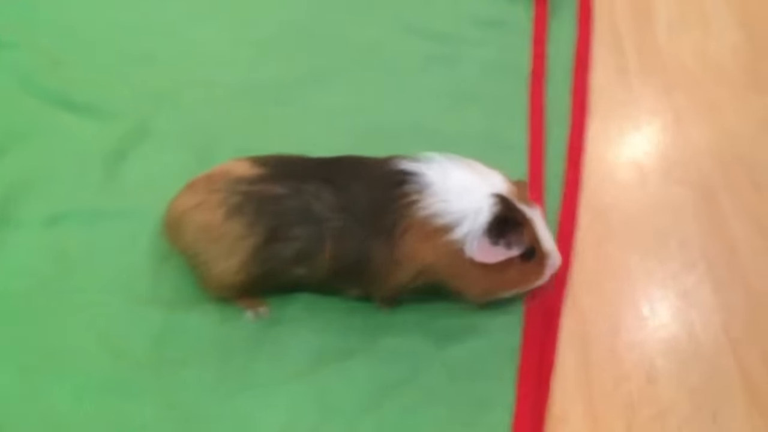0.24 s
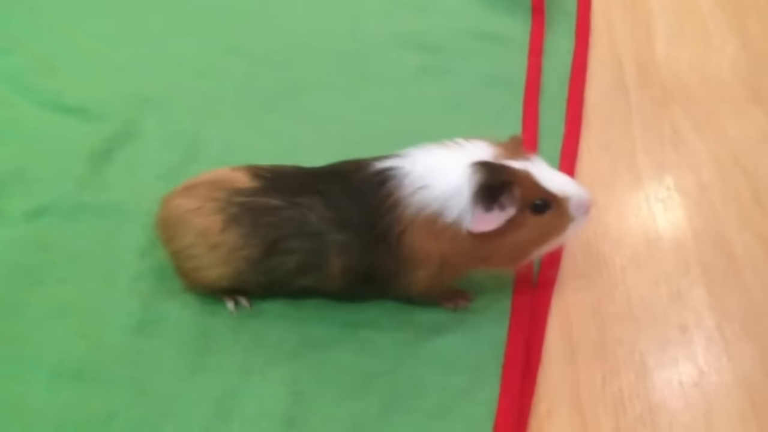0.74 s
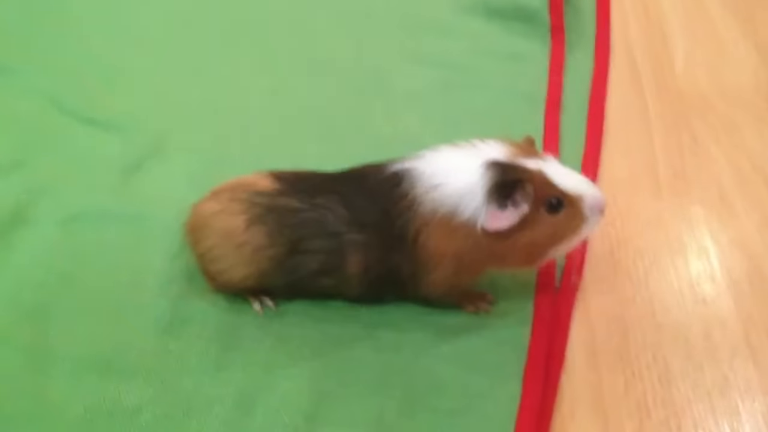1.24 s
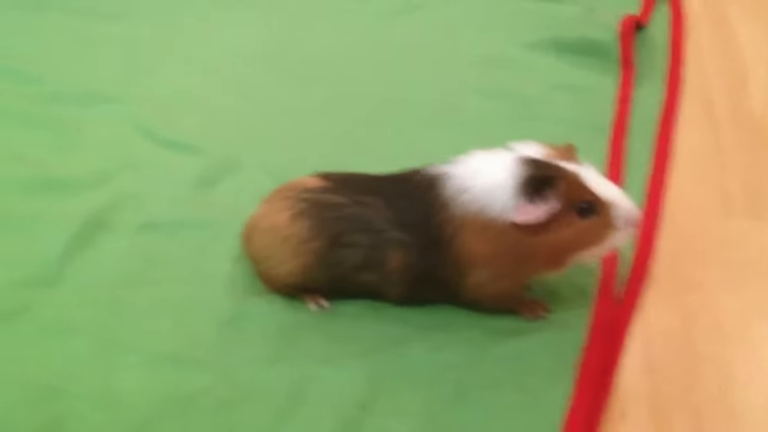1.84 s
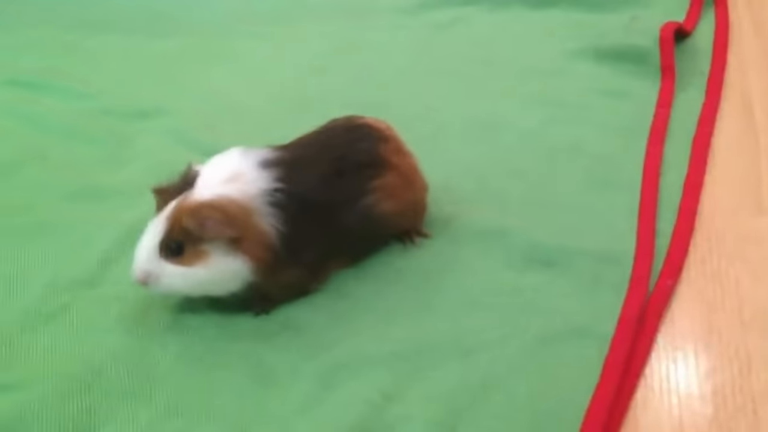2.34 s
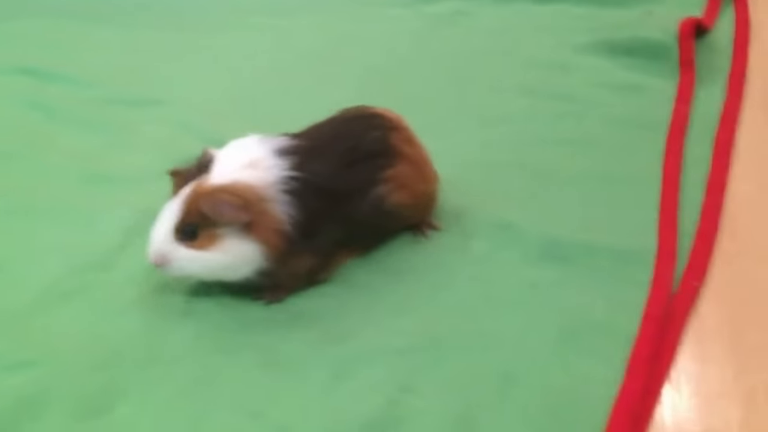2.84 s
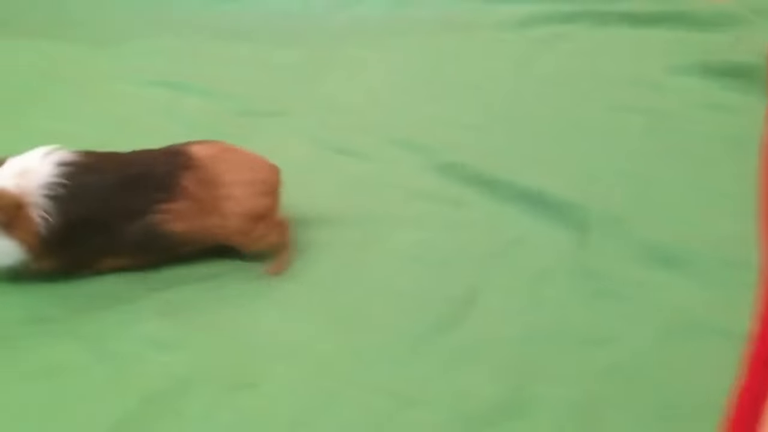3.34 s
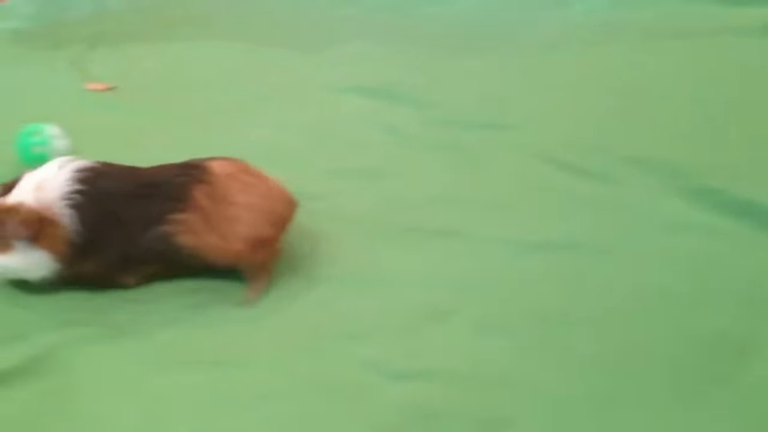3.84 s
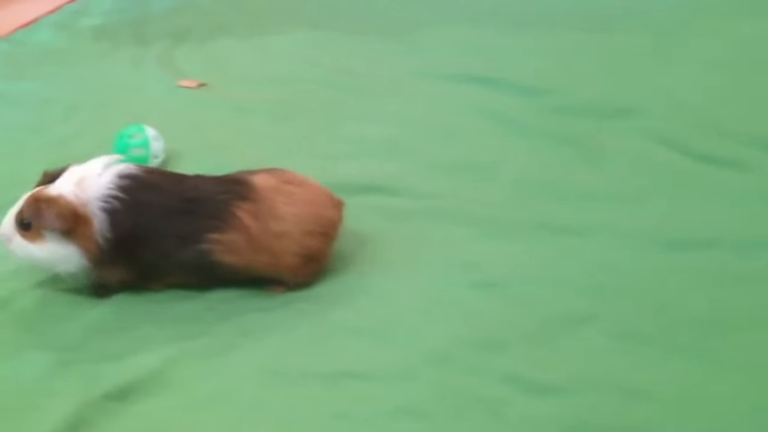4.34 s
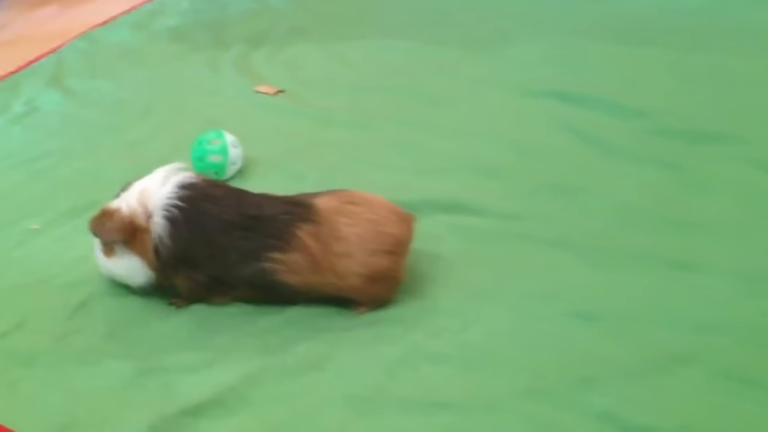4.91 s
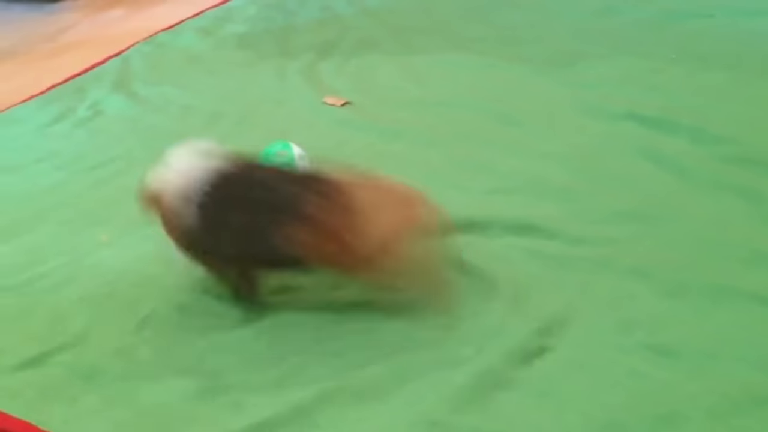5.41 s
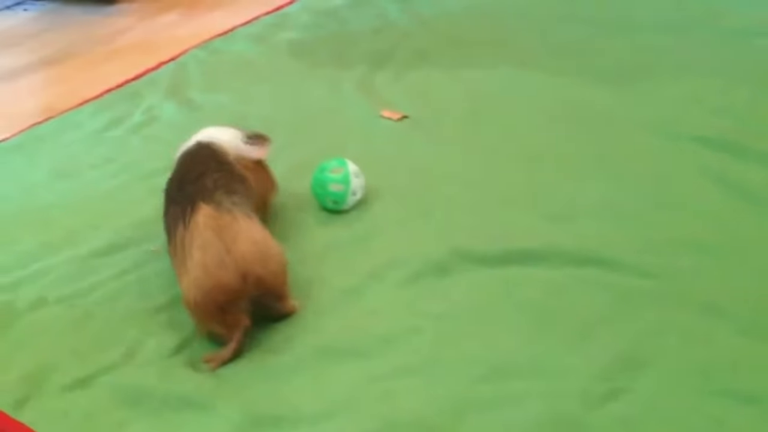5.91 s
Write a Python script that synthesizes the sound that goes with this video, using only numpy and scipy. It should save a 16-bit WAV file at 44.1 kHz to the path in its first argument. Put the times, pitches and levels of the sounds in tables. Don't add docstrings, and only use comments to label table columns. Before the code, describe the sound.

A guinea pig on a plastic-coated mat gives two short rising squeaks amid claw ticks and soft paw pats. Then the mat is dragged with a swelling rustle and a brief low fold drumming, the loudest moment. A scurry of ticks follows, with a run of squeaks and a very faint bell-ball tinkle, then a quick closing cluster of squeaks. Small hard-floored room, single close microphone, low hiss and rumble.

```python
import sys
import numpy as np
from scipy import signal
from scipy.fft import rfft, irfft, next_fast_len
from scipy.io import wavfile
from scipy.ndimage import map_coordinates

SR = 44100
rng = np.random.default_rng(int(sys.argv[2]) if len(sys.argv) > 2 else 0)


def inscribe(sig):
    pcm = np.round(np.clip(np.atleast_2d(sig).T, -1, 1) * 32767)
    wavfile.write(sys.argv[1], SR, pcm.astype(np.int16))


def ratio_of_db(decibels):
    return 10 ** (np.asarray(decibels, float) / 20)


N = 272097


def unit(x):
    return x / np.sqrt(np.mean(x ** 2) + 1e-20)


def noise():
    return rng.standard_normal(N)


def along(points, hz):
    f, v = np.transpose(points)
    return np.interp(np.log(hz + 1), np.log(f + 1), v)


def curves(rows, t):
    s, *cols = np.transpose(rows)
    return [np.interp(t, s, c) for c in cols]


def wobble(rate_hz):
    knots = rng.standard_normal(int(N * rate_hz / SR) + 4)
    return map_coordinates(knots, [np.arange(N) * rate_hz / SR])


def filtered(x, response):
    m = next_fast_len(N + 8192)
    return irfft(rfft(x, m) * response(np.fft.rfftfreq(m, 1 / SR)), m)[:N]


def modes(table):
    def response(f):
        return sum(ratio_of_db(db) * 1j * f * w / (c * c - f * f + 1j * f * w) for c, w, db in table)
    return response


def lowpass(corner_hz, order):
    return lambda f: 1 / (1 + (f / corner_hz) ** order)


def swell_db(t, start, end, rise_s, fall_s):
    early = np.clip(start - t, 0, None) / rise_s
    late = np.clip(t - end, 0, None) / fall_s
    return -20 * (early + late)


# start t/s, length t/s, level/dB, low pitch f/Hz, held pitch f/Hz
SQUEAKS = [(.114, 0.12, -51, 473.4, 558.8), (.597, 0.074, -52, 505, 509.5), (3.059, 0.047, -56.5, 513, 533),
           (3.271, 0.029, -55.5, 498, 509.5), (3.426, 0.12, -51.5, 519.8, 577.4),
           (3.682, 0.14, -53, 453, 543.4), (3.989, 0.11, -54.5, 516, 554), (4.498, .066, -54.5, 495, 489.7),
           (5.464, 0.066, -53.5, 442, 690), (5.529, 0.042, -53.5, 656, 653), (5.579, 0.06, -57.5, 647, 678),
           (5.754, .19, -54.5, 468, 557)]
# climb t/s, opening catch f/Hz, closing flick f/Hz, mouth opening level/dB, shrillness level/dB
EFFORT = [(0.0348, 94, 91, 0.5, -3), (0.035, 48, 77, 0, -6), (.03, 97, 5.5, -5, -12),
          (0.0087, 1, 4.3, -2, -14), (0.138, 17, 12, -0.5, -14), (0.0355, 2.6, 140, 0, -4),
          (0.1026, 5, 35, 2, -3), (.02, 48, 68, -5.5, -5), (.04, 89, 4, -4, 1), (0.023, 42, 5, 0.5, 1),
          (0.021, 3, 5, -4, 4), (0.089, 27.6, 142, -0.5, -1)]
RASP = [(.03, .25, .08), (.05, .3, .08), (.05, .45, .2), (.05, .6, .5), (.1, 1, .35), (.1, .4, .12),
        (.5, .3, .15), (.12, .5, .2), (.15, .7, .5), (.1, .5, .3), (.9, .6, .5), (.2, .65, .35)]
# f/Hz, level/dB
THROAT = [(1900, -5), (2300, -11), (2800, -15), (3500, -15), (4200, -20), (6000, -44)]
# f/Hz, width f/Hz, level/dB
HOARSE = [(600, 430, 18), (1500, 600, -15)]
ATTACK_S, RELEASE_S, SETTLE_S = 0.0064, 0.0043, 0.045
CATCH_S, FLICK_S, OVERSHOOT = 0.00915, 0.01727, 1.6
SWELL_DB, SPENT_DB = -0.5, 0.5
SECOND_DB, THIRD_DB, CLOSING_DB = -4.5, -9.5, -4
LAX_DB, LAX_S = -4.5, 0.082
END_ROUGH, HOARSE_DB = 0.3, -12


def squeaks():
    out, jitter, shimmer = np.zeros(N), wobble(90), wobble(45)
    flutter = [wobble(600) for k in range(8)]
    drift = [wobble(35) for k in range(8)]
    hoarse = unit(filtered(noise(), lambda f: modes(HOARSE)(f) * lowpass(3200, 4)(f)))
    for squeak, effort_row, rasp in zip(SQUEAKS, EFFORT, RASP):
        start, length, db, low_hz, held_hz = squeak
        climb, catch_hz, flick_hz, mouth_db, shrill_db = effort_row
        doubled, rough_start, rough_settled = rasp
        cut = slice(round(start * SR), round((start + length) * SR))
        t = np.arange(cut.stop - cut.start) / SR

        effort = 1 - np.exp(-(t / climb) ** 1.495) * np.cos(OVERSHOOT * t / climb)
        closing = np.exp((t - length) / FLICK_S)
        hz = low_hz + (held_hz - low_hz) * effort
        hz = hz + catch_hz * np.exp(-t / CATCH_S) + flick_hz * closing
        gate = np.clip(np.minimum(t / ATTACK_S, (length - t) / RELEASE_S), 0, 1)
        gate = gate * ratio_of_db(db + SWELL_DB * effort - SPENT_DB * closing)

        unsettled = np.exp(-(t / SETTLE_S) ** 2)
        doubling = doubled * unsettled
        rough = rough_settled + (rough_start - rough_settled) * unsettled + END_ROUGH * closing

        shut_db = mouth_db + LAX_DB * (1 - effort) * climb / LAX_S + CLOSING_DB * closing
        third_db = THIRD_DB + 1.78 * shut_db
        level_db = [0, SECOND_DB + shut_db, third_db]
        level_db += [third_db + shrill_db + along(THROAT, k * hz) for k in range(4, 9)]

        phase = 2 * np.pi * np.cumsum(hz * (1 + 0.012 * jitter[cut])) / SR
        out[cut] += gate * ratio_of_db(HOARSE_DB) * rough ** 1.5 * (1 + np.sin(phase)) * hoarse[cut]
        for k, part_db in enumerate(level_db, 1):
            tone = np.sin(k * phase + 1.2 * k * k) + doubling * np.sin((k + 0.5) * phase)
            blur = 1 + 0.5 * rough * (k - 0.45) * flutter[k - 1][cut]
            level = ratio_of_db(part_db + 0.74 * shimmer[cut] + 2.3 * drift[k - 1][cut])
            out[cut] += np.sqrt(2) * gate * level * blur * tone
    return out


# t/s, level/dB
DRAG = [
    (1.3, -65.5),
    (1.444, -49.5),
    (1.564, -40.5),
    (1.702, -35.5),
    (1.754, -37),
    (1.876, -40.5),
    (2.096, -39),
    (2.218, -44.5),
    (2.3, -58),
]
# f/Hz, density level/dB per Hz
MAT = [(71, -49), (120, -3), (282, 0), (469, 2.5), (563, -2.5), (623, -1), (1240, -4), (1650, 3),
       (2810, -8.5), (3810, -7), (5170, -9.5), (5960, -9.5), (11000, -20), (14600, -24), (15500, -36)]
# f/Hz, width f/Hz, level/dB
SHEET = [(3750, 700, -6)]
# f/Hz, width f/Hz, level/dB
CREASE = [(1604, 100, 0), (1820, 470, 0)]
# f/Hz, width f/Hz, level/dB
THRUM = [(275, 88, 0)]
# from t/s, to t/s, rise t/s, fall t/s
FOLD = (1.515, 1.697, 0.12, 0.031)
FOLD_DB, FOLD_IDLE_DB, WEIGHT_DB, FOLD_WEIGHT_DB = 3.5, -15.5, -5, 4.5
TAUT_SHARE, FOLD_SLACK = 0.22, 0.45


def drag():
    t = np.arange(N) / SR
    fold = ratio_of_db(swell_db(t, *FOLD))
    fade_in = np.clip((t - DRAG[0][0]) / 0.083, 0, 1)
    fade_out = np.clip((DRAG[-1][0] + 0.074 - t) / 0.067, 0, 1)
    force = fade_in * fade_out * ratio_of_db(curves(DRAG, t)[0] - 1.14)

    grit = noise() * ratio_of_db(1.8 * wobble(250) + 1.2 * wobble(30))
    colour = lambda f: ratio_of_db(along(MAT, f)) * (1 + abs(modes(SHEET)(f)))
    low = lowpass(2400, 6)
    hiss = unit(filtered(grit, lambda f: colour(f) * (1 - low(f))))
    body = unit(filtered(grit, lambda f: colour(f) * low(f)))

    slack, taut = (unit(filtered(grit, modes([mode]))) for mode in CREASE)
    tension = np.clip(TAUT_SHARE - FOLD_SLACK * fold + 0.2 * wobble(4.8), 0, 1)
    crease = np.sqrt(1 - tension) * slack + np.sqrt(tension) * taut
    body = body + ratio_of_db(-13 + wobble(5.2)) * crease

    thrum = unit(filtered(noise(), lambda f: modes(THRUM)(f) ** 2))
    drumming = ratio_of_db(-8) * (ratio_of_db(FOLD_DB) * fold + ratio_of_db(FOLD_IDLE_DB)) * thrum
    weight = ratio_of_db(WEIGHT_DB + FOLD_WEIGHT_DB * fold - 1.5)
    return force * (ratio_of_db(0.71 * wobble(8.97)) * hiss + weight * body + drumming)


def band_burst(t, hz, t60_s):
    puff = ratio_of_db(-60 * t / t60_s) * rng.standard_normal(len(t))
    for stage in range(2):
        puff = signal.lfilter(*signal.iirpeak(hz, 1.6, SR), puff)
    return puff / np.abs(puff).max()


# t/s, peak level/dB, f/Hz, high part level/dB
TICKS = [(0.0638, -39, 2490, -6), (0.0731, -29.5, 2980, -20), (0.425, -51, 3850, -25),
         (0.499, -50, 3670, -14), (0.9246, -41, 4570, -16), (0.9398, -40, 4540, -10),
         (1.279, -45.5, 2740, 15), (2.4186, -44.5, 3870, -19), (2.657, -43, 1740, -17),
         (2.663, -42, 3860, -17), (2.6814, -60, 2080, -15), (2.8583, -45.5, 1960, -16),
         (2.978, -34.5, 4300, -10), (3.3167, -53, 3250, -5), (3.4776, -41, 3940, -13),
         (3.486, -38, 4500, -13), (3.5024, -49, 4900, -16), (3.5107, -47, 3020, -12),
         (3.6565, -40.5, 2000, -32), (4.6259, -55, 3070, -14), (5.36, -55, 4590, 0),
         (0.517, -53, 662, -10), (1.386, -46.5, 730, 4), (2.13, -35, 1560, 9), (2.353, -54, 1500, -7),
          (2.418, -42.5, 1230, -16), (2.445, -51, 1090, -15), (2.625, -40, 776, -21),
          (2.976, -44.5, 550, 10), (3.144, -51, 600, -4), (3.174, -52.5, 730, -9), (3.212, -48, 705, -9)]


def claws(t):
    for s, db, hz, high_db in TICKS:
        crack = ratio_of_db(high_db - 15) * band_burst(t, 5900, 0.011)
        ring = band_burst(t, hz, 0.017)
        yield s, ratio_of_db(db - 3) * (crack + ring)


# t/s, peak level/dB, f/Hz
PATS = [(0.027, -51.5, 171), (0.169, -56, 188), (0.341, -47.5, 173), (0.528, -51.5, 191),
        (0.789, -53.5, 190), (0.85, -52.5, 200), (1.039, -53.5, 178), (1.249, -46.5, 173.4),
        (1.331, -49.5, 275), (1.386, -47.5, 427), (1.47, -44, 244), (1.555, -35, 255), (1.678, -36, 275),
        (2.042, -58, 276), (2.128, -37.5, 245), (2.207, -40, 335), (2.352, -49, 177), (2.444, -46, 184),
        (2.625, -44.5, 205), (2.846, -49, 211), (2.95, -50, 166), (3.214, -44, 215), (3.259, -51, 252),
        (3.63, -52, 183), (3.764, -50.5, 224), (4.66, -63, 183), (4.855, -49, 168), (5.356, -56, 327),
        (5.608, -43, 315), (5.734, -58, 294)]


def pats(t):
    for s, db, hz in PATS:
        push = ratio_of_db(db + 5.5 - 60 * t / 0.034) * (1 - np.exp(-t / 0.00061))
        yield s, push * np.sin(2 * np.pi * hz * t)


# t/s, level/dB
BELL = [
    (3.105, -69),
    (3.13, -69),
    (3.25, -91),
    (3.335, -72),
]
# f/Hz, level/dB, t60 t/s
BRASS = [(4500, 0, 0.078), (5870, 7, 0.067), (6500, 5, 0.11), (12000, 2, 0.1)]


def bell(t):
    for s, db in BELL:
        ring = np.zeros(len(t))
        for hz, mode_db, t60_s in BRASS:
            decay = ratio_of_db(db + mode_db + rng.normal(0, 3) - 60 * t / t60_s)
            ring += decay * np.sin(2 * np.pi * hz * rng.normal(1, 0.015) * t)
        yield s, ring


def taps():
    out, t = np.zeros(N + SR), np.arange(SR // 5) / SR
    for source in (claws, pats, bell):
        for s, hit in source(t):
            out[round(s * SR):][:len(t)] += hit
    crease = np.exp(-((np.arange(N) / SR - 6.105) / 0.023) ** 2)
    return out[:N] + ratio_of_db(-63.5) * crease * unit(filtered(noise(), modes([(1480, 380, 0)])))


# loudest t/s, level/dB, rise t/s, fall t/s, bright part level/dB
SCUFFS = [(.002, -50.5, 0.012, 0.13, -2), (0.074, -49, 0.021, 0.043, 5), (.11, -56, .04, 0.17, -20),
          (.935, -58, 0.15, 0.15, 8), (2.661, -50.5, 0.011, 0.026, -1), (2.68, -62, 0.13, 0.22, -12),
          (2.985, -62, .005, 0.16, 8), (3.24, -62.5, 0.39, 0.095, 3), (3.318, -71.5, .02, 0.073, 16),
          (3.5, -50.5, 0.037, 0.062, -4), (3.58, -67, 0.089, .03, -12), (5.46, -68.5, .04, 0.11, 11.5),
          (6.105, -67.5, 0.1, 0.24, 11)]
# f/Hz, density level/dB per Hz
SCUFF = [(180, -35), (300, 1), (744, -6.5), (985, -1.5), (1240, -5.5), (2980, -2.5), (5210, -5),
         (6900, -5.5), (9290, -12), (15500, -56)]


def scuffs():
    out, t = np.zeros(N), np.arange(N) / SR
    grit = noise() * ratio_of_db(2.8 * wobble(400))
    low = lowpass(5500, 6)
    dull = unit(filtered(grit, lambda f: ratio_of_db(along(SCUFF, f)) * low(f)))
    fine = unit(filtered(grit, lambda f: ratio_of_db(along(SCUFF, f)) * (1 - low(f))))
    for s, db, rise_s, fall_s, bright_db in SCUFFS:
        level = ratio_of_db(db - 4 + swell_db(t, s, s, rise_s, fall_s))
        out += level * (dull + ratio_of_db(bright_db - 11) * fine)
    return out


# f/Hz, t60 t/s
ROOM = [(200, 0.41), (600, 0.37), (2000, 0.37), (6000, 0.34), (14000, 0.38)]


def room(x, turns):
    out, step = np.zeros(2 * N), N // turns + 1
    for start in range(0, N, step):
        hz, t, z = signal.stft(rng.standard_normal(SR // 2), SR, nperseg=256)
        decay = ratio_of_db(-60 * t / along(ROOM, hz)[:, None])
        tail = signal.istft(z * decay, SR, nperseg=256)[1]
        wet = signal.fftconvolve(x[start:start + step], tail / np.linalg.norm(tail))
        out[start + 200:][:len(wet)] += wet
    return out[:N]


# t/s, level/dB
AIR = [(0, -63.5), (.15, -65), (1.25, -65), (2.45, -66.5), (6.17, -68)]
# f/Hz, density level/dB per Hz
HISS = [(40, -34), (70, -19), (120, -4), (240, -6), (330, -8.5), (540, -11), (1000, -10.5), (2500, -12.5),
        (4200, -13), (7000, -13.5), (8500, -15.5), (9800, -22), (11500, -17), (15500, -14)]
RUMBLE_DB = -2.5


def air():
    tone_db = curves(AIR, np.arange(N) / SR)[0]
    low = lowpass(420, 4)
    hiss = filtered(noise(), lambda f: ratio_of_db(along(HISS, f)) * np.sqrt(1 - low(f)))
    rumble = filtered(noise(), lambda f: ratio_of_db(along(HISS, f)) * np.sqrt(low(f)))
    lumps = ratio_of_db(2.2 * wobble(30) + 1.5 * wobble(4))
    return ratio_of_db(tone_db) * (unit(hiss) + ratio_of_db(RUMBLE_DB) * lumps * unit(rumble))


# t/s, level/dB
HUM = [(0, -84), (.7, -98), (2.1, -82), (2.6, -80), (3.1, -75.5), (3.6, -87), (5.2, -88), (6.1, -81)]
HUM_HZ = 90.3


def hum():
    phase = 2 * np.pi * np.cumsum(HUM_HZ * (1 + 0.012 * wobble(5.5))) / SR
    return ratio_of_db(curves(HUM, np.arange(N) / SR)[0] + 10.5) * np.sin(phase)


def scene():
    voice = ratio_of_db(4) * squeaks()
    pull = drag()
    contact = taps() + scuffs()
    wet = room(ratio_of_db(-6.5) * voice + ratio_of_db(-8) * contact + ratio_of_db(-6) * pull, turns=22)
    mono = voice + contact + pull + wet + air() + hum()
    return np.array([mono, mono])


def band_limit(x):
    return signal.sosfilt(signal.butter(12, 15690, fs=SR, output="sos"), x)


# f/Hz, width f/Hz, level/dB
NOTCH = [(5190, 400, -11)]


def record(dry):
    def capsule(f):
        bass_cut = (1j * f / (95 + 1j * f)) ** 3
        return bass_cut * (1 - modes(NOTCH)(f)) * lowpass(15350, 90)(f)
    own = ratio_of_db(-103) * unit(filtered(noise(), lowpass(70, 4)))
    mix = np.array([filtered(channel, capsule) + own for channel in dry])
    return band_limit(mix)


dry = scene()
out = record(dry)
inscribe(out)
```